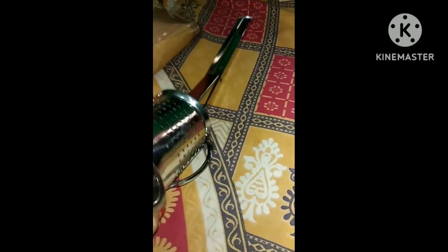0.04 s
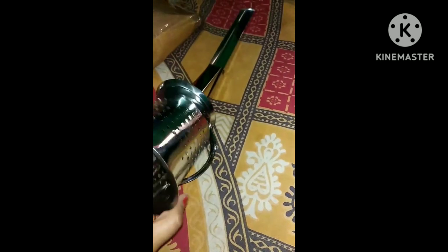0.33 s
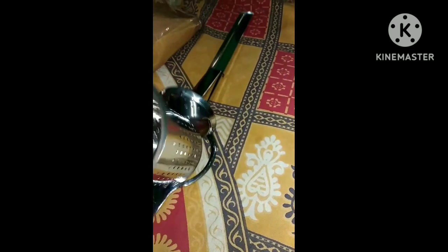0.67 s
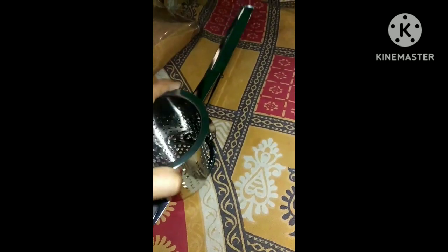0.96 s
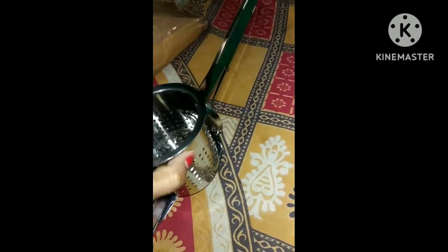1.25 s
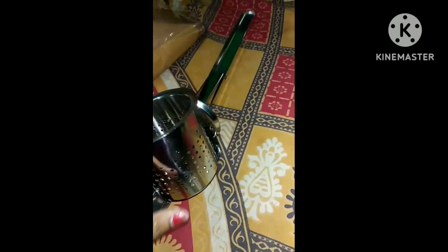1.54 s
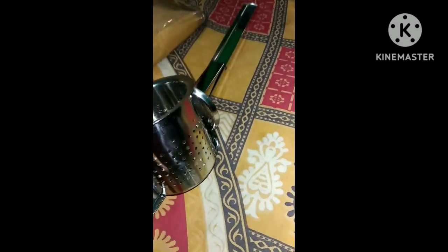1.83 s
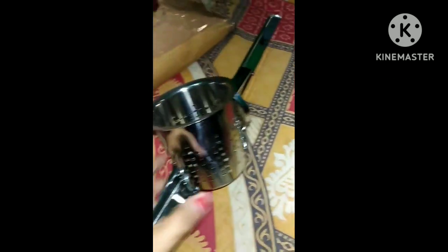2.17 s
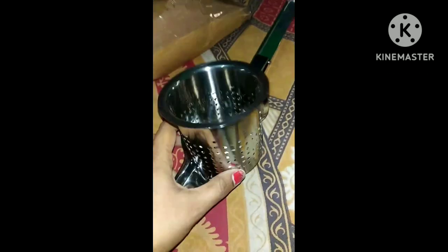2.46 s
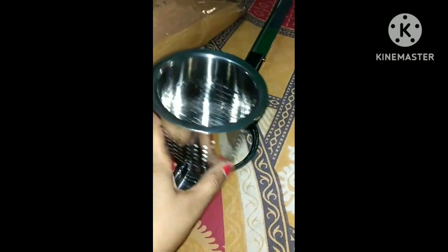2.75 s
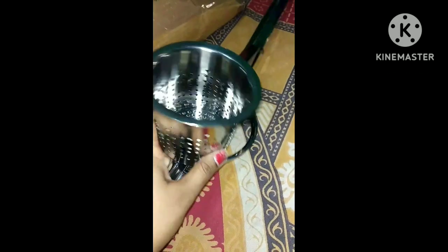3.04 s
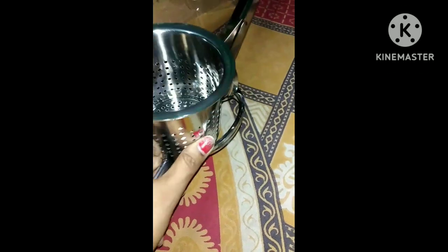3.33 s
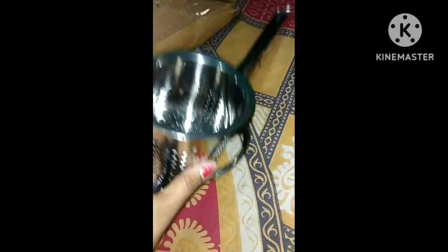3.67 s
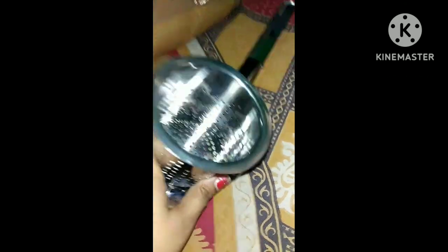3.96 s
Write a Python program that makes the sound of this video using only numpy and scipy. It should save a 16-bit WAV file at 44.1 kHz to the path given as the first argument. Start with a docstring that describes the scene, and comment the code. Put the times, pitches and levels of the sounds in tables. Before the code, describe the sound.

Close by in a quiet room, a metal kitchen press is handled, its plunger and handles clanking against the cup. The clatter thins to small clicks and tinks, then returns with brief ringing, over soft thuds of the grip.

```python
"""First comes a sharp steel clank: a perforated kitchen press is picked up and turned in the hand,
close by in a quiet room. Its plunger and handles knock against the cup, which rings until the hand
damps it. Between the knocks a loose part tinks, fingernails tick, fingers rub, and steel slides
on steel with short squeals. Underneath, the shifting grip thuds softly."""
import sys
import numpy as np
from scipy import signal
from scipy.fft import rfft, irfft
from scipy.io import wavfile
from scipy.ndimage import uniform_filter1d, map_coordinates

SR = 44100
rng = np.random.default_rng(int(sys.argv[2]) if len(sys.argv) > 2 else 0)


def write(x):
    x = np.atleast_2d(x).T
    wavfile.write(sys.argv[1], SR, np.round(np.clip(x, -1, 1) * 32767).astype(np.int16))


N = 176400
TAIL = np.arange(int(.55 * SR), dtype=np.float32) / SR   # seconds since a blow
LIKENESS, LEFT_LAG_S = 0.39, 0.0001649   # how alike left and right are; how late the left is


def from_db(db):
    """Turn decibels into a gain."""
    return 10 ** (np.asarray(db) / 20)


def unit_power(x):
    """Scale a sound to an average power of 1."""
    return x / np.sqrt(np.mean(x ** 2) + 1e-20)


def at_hz(points, hz):
    """Read between the rows of a table, on a musical pitch scale."""
    pitches, values = np.transpose(points)
    return np.interp(np.log(np.maximum(hz, 1)), np.log(pitches), values)


def dying(t60):
    """One fading curve for each ring time (t60: the seconds it takes to fall 60 dB)."""
    return np.exp(-np.float32(np.log(1000)) * TAIL / np.maximum(t60, 1e-3).astype(np.float32)[..., None])


def panned(db):
    """Left and right gains, the left louder by db."""
    gains = from_db(np.array([db, -db]) / 2)
    return gains / np.sqrt(np.mean(gains ** 2, axis=0))


def placed(starts, sounds):
    """Lay each sound at its start time."""
    out = np.zeros((2, N + len(TAIL)))
    for k, start in enumerate(np.clip(starts * SR, 0, N).astype(int)):
        out[:, start:start + len(TAIL)] += sounds[:, k]
    return out[:, :N]


def strokes(rows, fade_s=0.03):
    """The level of hand movements that fade in, hold and fade out."""
    t, level = np.arange(N) / SR, 0
    for start, length, db in rows:
        end = start + max(length, fade_s)
        corners = [start - fade_s, start + fade_s / 2, end, end + 2 * fade_s]
        level = level + from_db(db) * np.interp(t, corners, [0, 1, 1, 0])
    return level


def coloured_noise(colour):
    """Noise with a given tone colour, partly alike left and right, the left a little late."""
    hz = np.fft.rfftfreq(N, 1 / SR)
    shared, opposed = rfft(rng.standard_normal((2, N)))
    pair = np.sqrt(1 + LIKENESS) * shared + np.sqrt(1 - LIKENESS) * opposed * [[1], [-1]]
    pair[0] *= np.exp(-2j * np.pi * hz * LEFT_LAG_S)
    return unit_power(irfft(pair * from_db(at_hz(colour, hz)), N))


# The tone of the room's hush. Each row: pitch in Hz, relative level in dB.
AIR_COLOUR = [(30, -6.5), (130, -17.5), (220, -14.5), (400, -22.5), (600, -26.5), (900, -23), (1300, -20),
              (1600, -26.5), (3400, -32), (6500, -39.5), (8500, -26), (10500, -38), (14500, -46.5)]


def room_air(db=-60):
    """The faint, steady hush of a quiet room."""
    return from_db(db) * coloured_noise(AIR_COLOUR)


def room_echo(sound, db=-10.5, t60=0.24, delay_s=0.01):
    """The furnished room sends back a short, blurred echo."""
    echo = rng.standard_normal((2, len(TAIL))) * dying([t60]) * (TAIL > delay_s)
    echo /= np.sqrt(np.sum(echo ** 2) / 2)
    return from_db(db) * signal.fftconvolve(sound, echo, axes=1)[:, :N]


# The tone of the handling rumble. Each row: pitch in Hz, relative level in dB.
HANDLING_COLOUR = [(20, 0), (65, -1), (120, -11), (200, -17), (700, -57)]
# Shifts of the grip. Each row: start in seconds, length in seconds, level in dB.
GRIP_THUDS = [(0, 0.1, -40.5), (.26, 0.067, -50.5), (.95, 0.03, -49), (1.11, 0.05, -53.5),
              (1.52, 0.083, -57.5), (2.01, 0.17, -53), (2.5, 0.54, -61), (3.34, 0.058, -52)]


def handling(steady_db=-69, pan_db=-11.5):
    """A low rumble that swells into a soft thud when the hand shifts its grip."""
    colour = from_db(at_hz(HANDLING_COLOUR, np.fft.rfftfreq(N, 1 / SR)))
    rumble = unit_power(irfft(rfft(rng.standard_normal((2, N))) * colour, N))
    return (strokes(GRIP_THUDS) + from_db(steady_db)) * rumble * panned(pan_db)[:, None]


# The tone of skin on steel. Each row: pitch in Hz, relative level in dB.
SKIN_COLOUR = [(300, -4), (700, 21.5), (950, 24), (1250, 24.5), (1700, 16), (4000, 5.5)]
# Finger strokes. Each row: start in seconds, length in seconds, level in dB.
FINGER_RUBS = [(.39, 0.062, -60), (2.53, 0.074, -56), (3.03, 0.022, -61)]


def finger_rubs():
    """Skin rubs on the cup with a dull swish."""
    return strokes(FINGER_RUBS) * coloured_noise(SKIN_COLOUR)


# High notes lean to one side more than low ones. Each row: pitch in Hz, factor on the lean (pan_db).
LEAN_BY_PITCH = [(1000, 0.079), (6500, 0.16), (8500, 0.92), (14000, 1.8)]


def strike(hz, mode_db, pan_db, envelope, spread_db=4.5):
    """Each blow (a row of mode_db) sets the steel's modes, its natural notes, ringing a bit by chance."""
    chance = rng.standard_normal((len(mode_db), 4, len(hz)))
    size = from_db(mode_db + spread_db * chance[:, 0])
    size = size / np.sqrt(np.sum(size ** 2, axis=1, keepdims=True) / 2)   # same power for every blow
    size = size * panned(np.outer(pan_db, at_hz(LEAN_BY_PITCH, hz)))
    side_shift = np.pi * hz * LEFT_LAG_S + np.sqrt(-np.log(LIKENESS) / 2) * chance[:, 1]
    phase = np.arctan2(chance[:, 2], chance[:, 3]) + np.array([-side_shift, side_shift])
    angle = np.outer((2 * np.pi * hz).astype(np.float32), TAIL)
    sines = np.float32(size * np.cos(phase)) @ (np.sin(angle) * envelope)
    cosines = np.float32(size * np.sin(phase)) @ (np.cos(angle) * envelope)
    return sines + cosines   # sides x blows x samples


# The tone of the whole press. Each row: pitch in Hz, relative level in dB.
PRESS_COLOUR = [(300, -30), (1200, -19), (1550, -19.5), (2300, -12), (3300, -9.5), (4400, -12), (5500, -14),
                (6600, -11.5), (7200, -10), (8300, -1.5), (9300, -1.5), (10200, -10), (14200, -16.5)]
# The clear notes of the plunger and handles. Each row: pitch in Hz, relative level in dB.
CLEAR_MODES = [(1640, -28.5), (2140, -18), (2590, -12), (3070, -10), (3450, -14), (4140, -19.5),
               (4370, -19.5), (4850, -9.5), (5500, -17), (5820, -13), (6450, -5.5), (6650, -2),
               (7720, -6.5), (7900, 0.5), (8180, 5), (8410, -6), (8960, 3.5), (9140, -0.5), (9540, -8),
               (10740, -9), (12710, -10)]
CUTOFF_HZ, MODE_SPREAD_DB = 14450, 2


def press_modes(low_db, top_db, count, pull=.62):
    """The press's many unevenly spaced notes: their pitches, and their levels for each blow."""
    hz = 300 + (CUTOFF_HZ - 300) * (np.arange(count) + rng.random(count)) / count
    clear_hz = np.transpose(CLEAR_MODES)[0]
    nearest = clear_hz[np.abs(hz[:, None] - clear_hz).argmin(axis=1)]
    hz = hz + pull * (nearest - hz) * (hz > 1400) * (hz < 7400)   # middle notes gather round clear ones
    low_boost = np.outer(low_db, at_hz([(4500, 1), (7000, 0)], hz))
    top_boost = np.outer(top_db, at_hz([(9500, 0), (11500, 1)], hz))
    mode_db = at_hz(PRESS_COLOUR, hz) + MODE_SPREAD_DB * rng.standard_normal(count)
    return hz, mode_db + low_boost + top_boost


# Steel sliding on steel. Each row: start in seconds, length in seconds, level in dB.
STEEL_SLIDES = [(.46, 0.12, -56.5), (.71, 0.086, -51), (1.05, 0.28, -60.5), (1.38, 0.038, -52.5),
                (2.67, 0.16, -54), (3.12, 0.044, -59.5), (3.775, 0.111, -49.5), (.825, 0.014, -42),
                (.888, 0.016, -40)]
TOUCH_PAN_DB = 8


def slides(catches_per_s=1500, spread_db=4, t60=.07):
    """Sliding steel catches in many tiny jolts, and each makes the press ring briefly."""
    sizes = from_db(spread_db * np.minimum(rng.exponential(1, (2, N)), 4))
    signs = rng.choice([-1, 1], (2, N))
    catches = sizes * signs * (rng.random((2, N)) < catches_per_s / SR)
    body = strike(*press_modes([0], [0], count=120), [TOUCH_PAN_DB], dying([t60]))[:, 0]
    scrape = unit_power(signal.fftconvolve(catches[:1], body, axes=1)[:, :N])
    return strokes(STEEL_SLIDES) * scrape


# Squeals. Each row: start in seconds, length in seconds, first and last pitch in Hz, level in dB.
STEEL_SQUEALS = [(.009, 0.015, 3700, 2160, -38), (0.73, .036, 8900, 8970, -61),
                 (0.879, 0.031, 1647, 1520, -46.5), (0.902, 0.0308, 1600, 1950, -47)]


def squeals(roughness_hz=150):
    """Catching steel sings a short, rough note that glides as the point of contact moves."""
    t, out = np.arange(N) / SR, 0
    lowpass = signal.butter(2, roughness_hz, fs=SR, output="sos")
    rough = unit_power(signal.sosfilt(lowpass, rng.standard_normal(N)))
    for start, length, first_hz, last_hz, db in STEEL_SQUEALS:
        progress = np.clip((t - start) / length, 0, 1)
        angle = 2 * np.pi * np.cumsum(first_hz + (last_hz - first_hz) * progress) / SR
        swell = np.sqrt(np.abs(np.sin(np.pi * progress)))
        out = out + from_db(db) * swell * (np.sin(angle) + .5 * rough * np.cos(angle))
    return out * np.ones((2, 1))


# Fingernail taps. Each row: start in seconds, level in dB, boost of the low notes in dB.
NAIL_TICKS = [(1.131, -49, 9), (3.043, -54, 10.5), (3.198, -49, -2), (3.222, -50.5, 2), (3.677, -49, 15.5)]


def nail_ticks(t60=0.041):
    """Fingernails tick dryly on steel that the hand holds still."""
    starts, db, low_db = np.transpose(NAIL_TICKS)
    hz, mode_db = press_modes(low_db, np.zeros_like(starts), count=150)
    taps = strike(hz, mode_db, np.full(len(starts), TOUCH_PAN_DB), envelope=1)
    return placed(starts, from_db(db)[:, None] * taps * dying([t60]))


CRACK_T60_S = 0.0065   # the click at the instant of contact


def free_part(starts, db, top_db, modes, pan_db):
    """A part that is free to move clicks when hit, then rings with a few pure notes."""
    hz, mode_db, t60 = np.transpose(modes)
    mode_db = mode_db + np.outer(top_db, hz > 7400)
    envelope = dying(t60) + dying([CRACK_T60_S])
    rings = strike(hz, mode_db, np.full(len(starts), pan_db), envelope, spread_db=MODE_SPREAD_DB)
    return placed(starts, from_db(db)[:, None] * rings)


# The loose part's notes. Each row: pitch in Hz, relative level in dB, ring time in seconds.
LOOSE_PART_MODES = [(8255, 23, 0.066), (9530, 11, 0.17), (13200, 13.5, 0.069)]
# Its light touches. Each row: start in seconds, level in dB.
LOOSE_PART_TOUCHES = [(1.787, -43.5), (1.99, -42), (2.137, -51), (3.425, -46)]


def tinks():
    """A small loose part touches the steel and gives a high tink."""
    starts, db = np.transpose(LOOSE_PART_TOUCHES)
    return free_part(starts, db, np.zeros_like(starts), LOOSE_PART_MODES, pan_db=18)


# The cup's notes. Each row: pitch in Hz, relative level in dB, ring time in seconds.
CUP_NOTES = [(3101, -16, .3), (4538, 0, .28), (5071, -13, .36), (5168, -9, .25), (6169, -11, .23),
             (6900, -10, .14), (7908, -9, .32), (8053, -7, .36), (8452, -1, .48), (9480, -11, .24)]
# Knocks on the cup. Each row: start in seconds, level in dB, boost of the top notes in dB.
CUP_KNOCKS = [(2.43, -57, 3), (2.583, -48.5, -13), (2.817, -36.5, 5.5), (3.421, -56, -13)]


def cup_rings():
    """The cup is struck while it is free to ring, like a small bell."""
    return free_part(*np.transpose(CUP_KNOCKS), CUP_NOTES, pan_db=1.0)


def ring_time(hz, longest_s=0.36, halved_at_hz=14000):
    """Low notes ring long; high ones die sooner."""
    return longest_s / (1 + (hz / halved_at_hz) ** 2)


def wavering(t60, fastest_hz=44, depth=1.2):
    """Each fading note wavers at its own rate as loosely touching parts pass the vibration around."""
    rate, phase = rng.random((2, len(t60), 1)).astype(np.float32)
    beat = 1 + depth * np.sin(2 * np.pi * (fastest_hz * rate * TAIL + phase))
    return dying(t60) * beat / (1 + depth ** 2 / 2) ** .5


def grip_detuned(sounds, detune=.03):
    """The grip and the point of contact shift the pitch of each blow a little."""
    speeds = 1 + detune * rng.uniform(-1, 1, sounds.shape[1])
    samples = np.arange(len(TAIL))
    return np.array([[map_coordinates(blow, [samples * speed], order=3)
                      for blow, speed in zip(side, speeds)] for side in sounds])


def chatter(count, bounce_s=.003, bounce_db=3.2):
    """The level of each blow jumps about as the loose parts bounce on one another."""
    lumps = uniform_filter1d(rng.standard_normal((count, len(TAIL))), int(bounce_s * SR), axis=1)
    ease_in = np.minimum(TAIL / (2 * bounce_s), 1)
    return unit_power(from_db(bounce_db * unit_power(lumps) * ease_in))


# Steel hitting steel. Each row: start in seconds, then five values in dB (clack level, ring level,
# low-note boost, top-note boost, leftward lean before pitch scales it), then clack ring time in seconds.
STEEL_CLANKS = [(0.008, 2.5, -10.5, -6.5, 2, 11, 0.021), (0.019, -11.5, -14.5, -8.5, 0.5, 6, 0.3),
                (0.196, -16, -20, -2.5, 4, 6, 0.058), (0.226, -13, -23.5, -4.5, 0, 10, 0.019),
                (0.278, -22, -59, -18, 2, 15, 0.12), (0.398, -24.5, -34, -7.5, 1, 6, 0.17),
                (0.413, -20.5, -36, -8, -5, 17, 0.065), (0.459, -20, -65, -36, -8, 24, 0.028),
                (0.538, -25.5, -47, -16, 5, 17, 0.08), (0.551, -23, -52, -7.5, -5, 7, 0.14),
                (0.783, -28, -63, -10, -4, 25, 0.024), (0.815, -19, -26.5, 2.5, 6, 7, 0.036),
                (0.828, -8, -37, -5, 5, 12, 0.049), (0.844, -15, -55, 0.5, -13, 6, 0.021),
                (0.879, -14.5, -27, -3, 5, 3, 0.083), (0.888, -10, -47, -12.5, -2.5, 35, 0.05),
                (0.9536, -6, -49, -7.5, -7.5, 8.5, 0.027), (1.728, -21, -70, -40, 4.5, 20, 0.028),
                (1.739, -38, -62, -3.5, -0.5, 8.5, 0.034), (2.43, -25.5, -45.5, -3.5, 3, 10, 0.055),
                (2.58, -17, -58, -1.5, 4, 7, 0.069), (2.597, -21.5, -70.5, -6, -3, 5, 0.11),
                (2.751, -35.5, -39.5, 1.5, 1, 13, 0.043), (2.813, -20, -26.5, -4, 12, 1, 0.048),
                (2.823, -9.5, -66, -10, 3, 2, 0.066), (2.883, -33, -56, -10, -27, 3, 0.092),
                (3.748, -12, -32.5, -1, 1.5, 11, 0.036), (3.8, -14.5, -51, -7.5, 1.5, 19, 0.041),
                (3.838, -22.5, -43, -37, -27, 21, 0.034), (3.869, -24.5, -55, -32, -4, 22, 0.07),
                (3.906, -22, -68, -10, -3, 50, 0.047), (3.951, -25, -68, -10.5, -8.5, 24, 0.065)]
CLACK_DB, RING_DB, FRAME_DB = -0.5, -4, -8.5   # added to the levels in the rows


def clanks(crack_db=-11.5, grip_db=-6, build_up_s=0.00034):
    """Plunger and handles hit the cup: a crack, a quickly damped clack, then the freer notes ring on."""
    starts, clack_db, ring_db, low_db, top_db, pan_db, t60 = np.transpose(STEEL_CLANKS)
    contact = dying(t60) * chatter(len(starts)) + from_db(crack_db) * dying([CRACK_T60_S])
    hz, mode_db = press_modes(low_db, top_db, count=260)
    clack = grip_detuned(strike(hz, mode_db, pan_db, envelope=0.49)) * contact
    hz, mode_db = press_modes(low_db + grip_db, top_db, count=170)   # the grip damps low notes most
    ring_t60 = ring_time(hz) * (1 + rng.random(len(hz))) / 2
    ring = strike(hz, mode_db, pan_db, wavering(ring_t60))
    hz, mode_db = np.transpose(CLEAR_MODES)
    frame = strike(hz, np.tile(mode_db, (len(starts), 1)), pan_db, wavering(ring_time(hz)))
    ring_on = from_db(RING_DB) * ring + from_db(FRAME_DB) * frame
    blows = from_db(clack_db + CLACK_DB)[:, None] * clack + from_db(ring_db)[:, None] * ring_on
    return placed(starts, blows * (1 - np.exp(-TAIL / build_up_s)))


def scene():
    """The press and its echo, over the handling rumble and the hush of the room."""
    press = clanks() + tinks() + cup_rings() + nail_ticks() + slides() + finger_rubs() + squeals()
    return press + room_echo(press) + handling() + room_air()


def record(dry):
    """Cut off the very highest treble steeply."""
    return signal.sosfilt(signal.ellip(10, .2, 70, CUTOFF_HZ, fs=SR, output="sos"), dry)


dry = scene()
out = record(dry)
write(out)
```